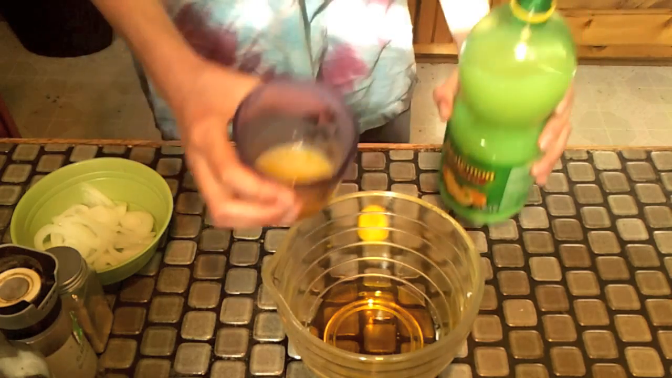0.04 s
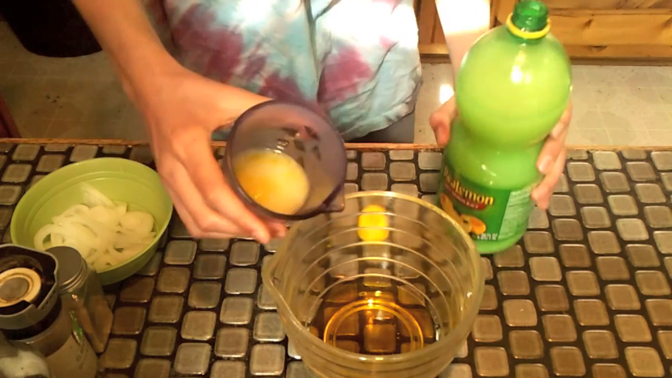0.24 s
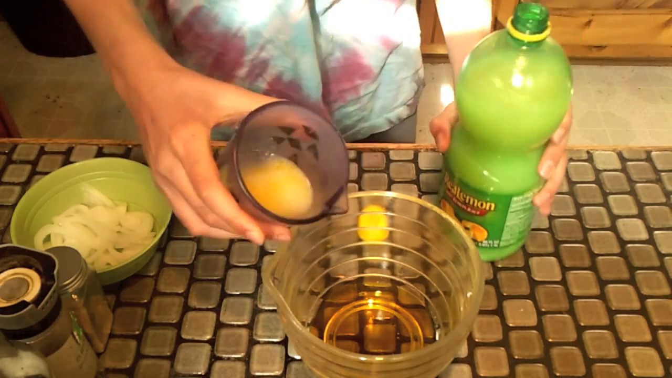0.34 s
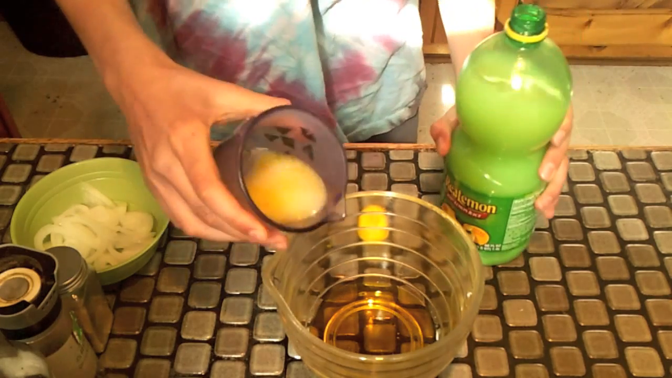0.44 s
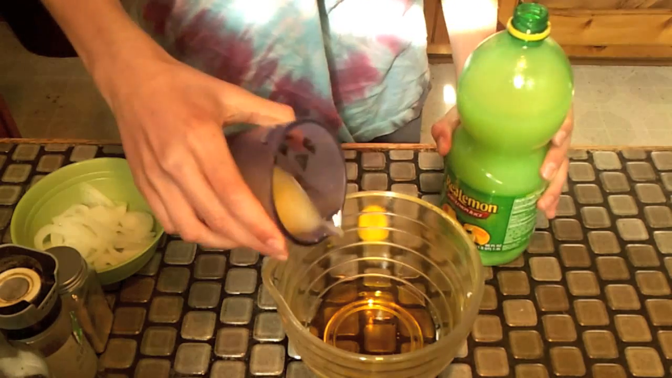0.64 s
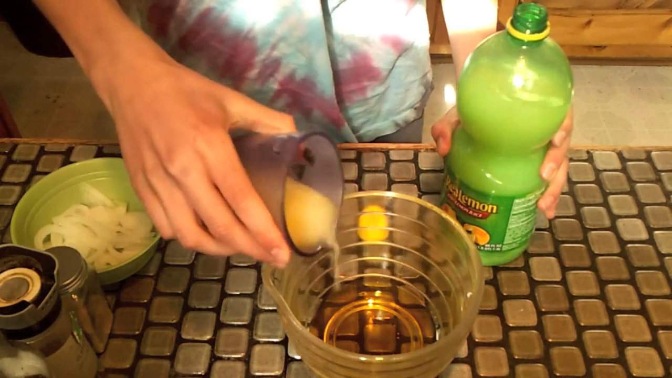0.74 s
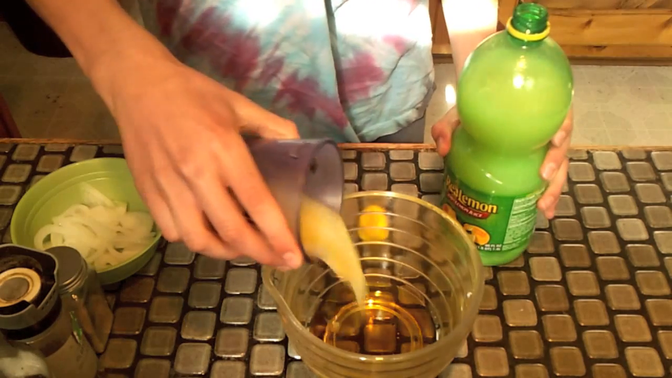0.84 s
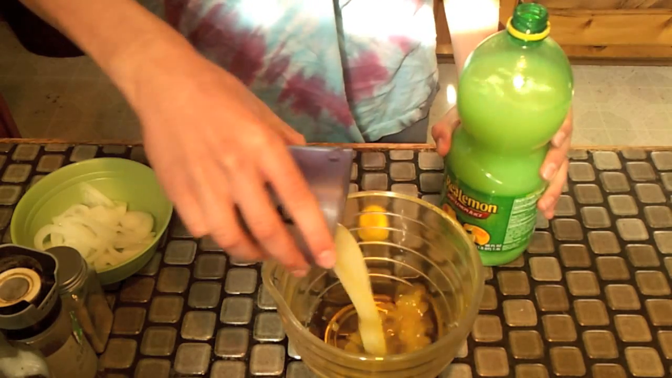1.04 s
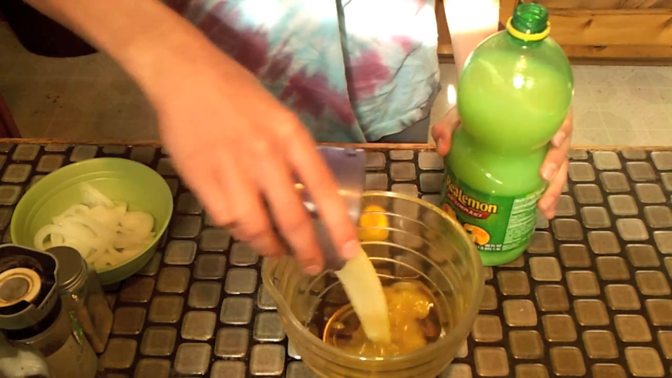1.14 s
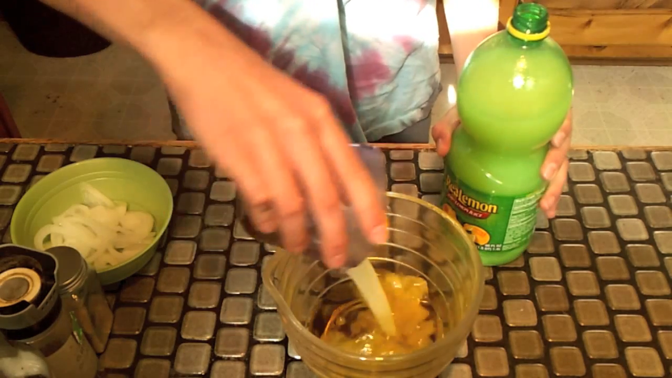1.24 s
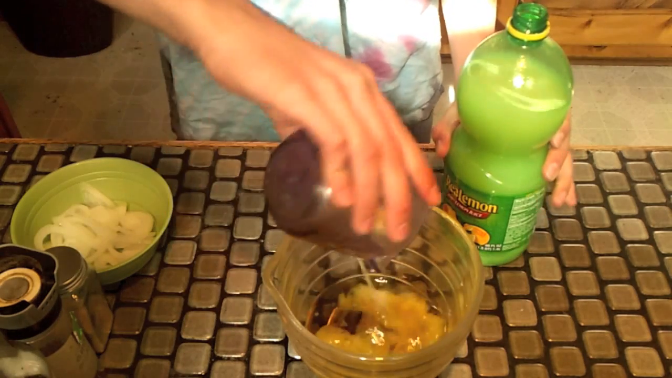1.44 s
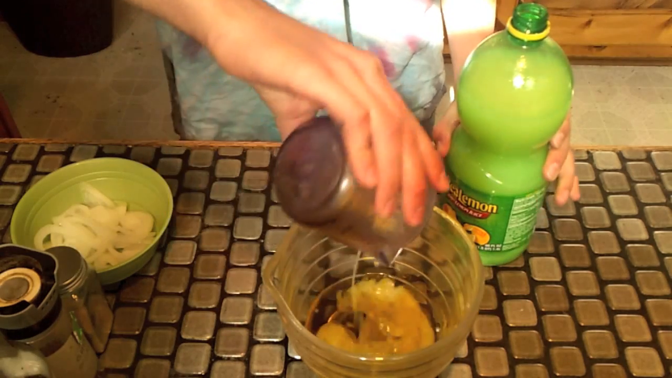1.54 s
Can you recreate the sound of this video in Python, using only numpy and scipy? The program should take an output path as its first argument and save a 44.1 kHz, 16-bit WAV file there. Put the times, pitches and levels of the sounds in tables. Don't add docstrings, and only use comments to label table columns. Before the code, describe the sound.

A plastic bottle thuds hard on a tiled counter, a glass bowl rings, then liquid drips and pops

```python
import sys
import numpy as np
from scipy import signal
from scipy.io import wavfile

SR = 44100
rng = np.random.default_rng(int(sys.argv[2]) if len(sys.argv) > 2 else 0)


def generate_wav(signal):
    frames = np.transpose(np.atleast_2d(signal))
    scaled = np.clip(frames, -1, 1) * 32767
    pcm = np.round(scaled).astype(np.int16)
    wavfile.write(sys.argv[1], SR, pcm)


def amplitude_ratio(level_db):
    exponent = np.asarray(level_db, float) / 20
    return 10 ** exponent


N = 70560
T = np.arange(N) / SR


def rms_one(x):
    return x / np.sqrt(np.mean(x ** 2) + 1e-20)


def at_hz(points, hz):
    table_hz, value = np.transpose(points)
    return np.interp(np.log(hz), np.log(table_hz), value)


def passband(x, low_hz, high_hz):
    edges_hz = [low_hz, min(high_hz, .45 * SR)]
    return signal.sosfilt(signal.butter(2, edges_hz, "band", fs=SR, output="sos"), x)


def ring(clicks, hz, t60_s):
    radius = amplitude_ratio(-60 / (t60_s * SR))
    angle = 2 * np.pi * hz / SR
    feedback = [1, -2 * radius * np.cos(angle), radius * radius]
    return signal.lfilter([0, np.sin(angle)], feedback, clicks + 1e-18)


def bands(spectrum, shape):
    edges_hz = 18 * 2 ** (np.arange(30) / 3)
    white = rng.standard_normal((2, N + 8192))
    out = 0
    for k, (low_hz, high_hz) in enumerate(zip(edges_hz, edges_hz[1:])):
        hz = np.sqrt(low_hz * high_hz)
        sos = signal.butter(2, [low_hz, high_hz], "band", fs=SR, output="sos")
        band = signal.sosfilt(sos, white[k % 2])[-N:]
        out = out + amplitude_ratio(at_hz(spectrum, hz)) / np.sqrt(300) * 12 * band * shape(hz)
    return out


# start_s [s], level_db [dB]
CONTACTS = [
    (0.2457, 0),
    (0.2466, -5),
    (0.2479, -4),
    (0.2508, -12),
]
BLOW_S = CONTACTS[0][0]
# pitch_hz [Hz], level_db [dB], t60_s [s]
BODY_LOW = [(151.5, -27, 0.4), (191, -13.5, 0.098), (232.6, -7, 0.21), (321, -14, 0.078),
            (404.7, -16.5, 0.11), (455, -21, 0.1), (590, -23, .1), (690.5, -13, .14), (779, -8.5, 0.026),
            (861, -15.5, 0.022), (1008, -13.5, 0.034), (1053, -19, 0.097), (1300, -51, 0.052)]
# pitch_hz [Hz], level_db [dB], t60_s [s]
BODY_HIGH = [(2660, -22, .03), (3560, -25, 0.017), (3497, -10.5, 0.034), (3620, -15.5, .02),
             (4480, -24.5, .04), (5750, -10, 0.013), (5900, -14.5, 0.026), (6286, -9, 0.022),
             (6944, -12, 0.018)]


def body():
    start_s, foot_db = np.transpose(CONTACTS)
    out = np.zeros(N)
    for hz, level_db, t60_s in BODY_LOW + BODY_HIGH:
        clicks = np.zeros(N)
        spread_db = 2.0 * rng.standard_normal(len(start_s))
        clicks[(start_s * SR).astype(int)] = amplitude_ratio(foot_db + level_db + spread_db)
        out += ring(clicks, hz, t60_s)
    return out


# pitch_hz [Hz], level_db [dB per Hz]
RATTLE = [(60, -16), (200, -15), (450, 1), (1000, -3), (2000, -19.5), (3500, -15.5), (6300, -33),
          (10000, -55)]
# pitch_hz [Hz], t60_s [s]
RATTLE_T60 = [(100, 0.58), (500, 0.37), (1400, 0.29), (4000, 0.26), (6000, 0.44), (11000, .12)]


def rattle():
    since_s = np.maximum(T - BLOW_S, 0)

    def shape(hz):
        decay = amplitude_ratio(-60 * since_s / at_hz(RATTLE_T60, hz))
        return decay * np.minimum(since_s * hz / 1.8, 1)

    rattle_db = -17.5
    return 8 * amplitude_ratio(rattle_db) * bands(RATTLE, shape)


def bottle():
    low_hz, high_hz = 115, 9500
    thud = passband(rattle() - body(), low_hz, high_hz)
    return passband(thud, low_hz, high_hz)


# start_s [s], level_db [dB], pitch_hz [Hz], t60_s [s]
CRACKS = [
    (0.2459, -14, 11000, .004),
    (0.246, -22, 14000, .003),
    (0.2479, -24, 10500, .004),
    (0.248, -30, 13500, .003),
]


def cracks():
    rise_s = 0.00019
    out = np.zeros(N)
    for start_s, level_db, hz, t60_s in CRACKS:
        since_s = np.maximum(T - start_s, 0)
        envelope = amplitude_ratio(level_db - 60 * since_s / t60_s) * np.minimum(since_s / rise_s, 1)
        out += envelope * np.sin(2 * np.pi * hz * since_s)
    return out


# pitch_hz [Hz], width_hz [Hz], level_db [dB], t60_s [s]
BUZZ = [(3360, 440, -38, 0.23), (6150, 580, -24, 0.26), (5610, 1800, -32.5, .2), (7470, 1100, -45, 0.13),
        (216, 47, -24, 0.44)]


def buzz():
    rise_s = 0.00265
    since_s = T - BLOW_S
    out = np.zeros(N)
    for hz, width_hz, level_db, t60_s in BUZZ:
        noise = rms_one(passband(rng.standard_normal(N), hz - width_hz / 2, hz + width_hz / 2))
        decay = amplitude_ratio(level_db - 60 * np.maximum(since_s, 0) / t60_s)
        out += decay * np.clip(since_s / rise_s, 0, 1) * noise
    return out


def rustle():
    level_db, low_hz, high_hz = -59, 1200, 5000
    rub = rms_one(passband(rng.standard_normal(N), low_hz, high_hz))
    return amplitude_ratio(level_db) * rub * (T < BLOW_S)


def settle():
    start_s, level_db, pitch_hz, t60_s, rise_s = 0.556, -33, 205, .16, .01
    since_s = np.maximum(T - start_s, 0)
    envelope = amplitude_ratio(level_db - 60 * since_s / t60_s) * np.minimum(since_s / rise_s, 1)
    return envelope * np.sin(2 * np.pi * pitch_hz * since_s)


# pitch_hz [Hz], level_db [dB], t60_s [s]
BOWL = [(824.3, -36, 1.45), (848, -28, .72), (2106, -32, .72), (2173, -34.5, .62), (3488, -26, .24),
        (3440, -30, .26), (6366, -29, .2), (9650, -41, .15), (8580, -43, .14)]


def bowl():
    delay_s, rise_s = .006, .025
    since_s = np.maximum(T - BLOW_S, 0)
    rung_s = np.maximum(since_s - delay_s, 0)
    swell = 1 - np.exp(-rung_s / rise_s)
    out = np.zeros(N)
    for hz, level_db, t60_s in BOWL:
        out += amplitude_ratio(level_db - 60 * since_s / t60_s) * swell * np.sin(2 * np.pi * hz * rung_s)
    return out


# delay_s [s], level_db [dB]
BOWL_ECHOES = [(.0012, -13), (.0022, -15), (.0038, -19), (.0058, -27), (.0135, -29), (.0162, -25)]


def bowl_echoes(x):
    response = np.zeros(SR // 20)
    response[0] = 1
    for k, (delay_s, level_db) in enumerate(BOWL_ECHOES):
        response[int(delay_s * SR)] = amplitude_ratio(level_db) * (-1) ** k
    return signal.fftconvolve(x, response)[:N]


# start_s [s], peak_db [dB], pitch_hz [Hz],
# ring_cycles [cycles], rise [pitch share]
DRIPS = [(0.1138, -33.5, 6000, 8.9, 0.036), (0.2234, -40, 6200, 50, 0.012), (0.3042, -19, 5600, 8.1, 0.028),
         (0.3046, -30.5, 8300, 5.7, 0), (0.573, -34, 5880, 18, 0.062), (1.02, -45, 1363, 30, 0.13),
         (1.0207, -42.5, 5000, 7.6, 0.055), (1.1458, -39, 3870, 17, 0.12), (1.155, -49, 2980, 13, .05),
         (1.1625, -37, 5900, 20, 0.023), (1.174, -34, 5200, 4.4, 0.011), (1.2077, -40, 5700, 13, 0.048),
         (1.219, -46.5, 2700, 19, 0.16), (1.2477, -31, 5900, 10.4, 0.017), (1.248, -41.5, 1660, 3.5, 0.073),
         (1.318, -34, 5900, 11, 0), (1.325, -26.5, 5820, 6, .05), (1.404, -40, 7900, 23, 0.083),
         (1.415, -37.5, 5160, 14, 0.034), (1.4537, -29, 6550, 19, -.05), (1.465, -35, 5300, 56, 0.16),
         (1.528, -33.5, 7000, 6.2, 0.011), (1.5509, -24, 4160, 6.9, 0.076),
         (1.1, -35, 5350, 11, 0.023), (1.559, -45, 4400, 30, .05), (2.2, -49, 2600, 3.5, 0),
                (1.0205, -53, 2800, 2.2, 0), (1.2475, -40, 4500, 2.5, 0), (0.67, -58, 8100, 5.5, -0.01),
                (1.539, -30.5, 7200, 7.3, -0.023), (1.552, -46, 1600, 8.6, -0.037),
                (1.564, -45, 1500, 7.6, 0.034), (1.565, -43, 4300, 2, 0), (1.5694, -32.5, 6250, 31, -.04),
                (1.577, -39, 5000, 13, .05)]


def drips():
    pops = []
    for start_s, peak_db, hz, cycles, rise in DRIPS:
        up_cycles, down_cycles = min(.3 * cycles, 3.0), .32 * cycles
        pops.append((start_s, peak_db, hz, up_cycles, down_cycles, rise / cycles))
    pops.append((1.0996, -10, 5450, 6.5, 2.7, 0))

    out = np.zeros(N + SR)
    t = np.arange(SR // 10) / SR
    for start_s, peak_db, hz, up, down, rise_per_cycle in pops:
        cycle = t * hz
        swell = np.sin(np.pi / 2 * cycle / up) ** 2
        fall = np.exp(-(np.abs(cycle - up) / down) ** 1.7)
        tone = np.sin(2 * np.pi * cycle * (1 + rise_per_cycle * cycle / 2))
        out[int(start_s * SR):][:len(t)] += amplitude_ratio(peak_db) * np.where(cycle < up, swell, fall) * tone
    return bowl_echoes(out)


def cavity():
    start_s, length_s, level_db = 1.103, .05, -46.5
    from_hz, to_hz = 5050, 5900
    progress = np.clip((T - start_s) / length_s, 0, 1)
    hz = from_hz + (to_hz - from_hz) * progress ** 2
    flutter = 1 + .7 * rms_one(passband(rng.standard_normal(N), 60, 600))
    envelope = amplitude_ratio(level_db - 6 * progress) * np.sqrt(np.sin(np.pi * progress) + 1e-12)
    return envelope * flutter * np.sin(2 * np.pi * np.cumsum(hz) / SR)


def fizz():
    from_s, fizz_per_s, fizz_db, fizz_hz = 1.0, 250, -62, 4500
    spray_s, spray_per_s, spray_db, spray_fade_s = 1.5505, 2000, 9, .035
    spray = (T > spray_s) * np.exp(-np.maximum(T - spray_s, 0) / spray_fade_s)
    size_db = 3.0 * np.minimum(rng.exponential(1, N), 2.5) + spray_db * spray
    sizes = amplitude_ratio(size_db) * rng.choice([-1, 1], N)
    chance = (fizz_per_s + spray_per_s * spray) / SR
    bursts = sizes * (rng.random(N) < chance) * (T > from_s)
    pitches_hz = fizz_hz * np.geomspace(.33, 1.5, num=16)
    dealt = rng.integers(0, 16, N)
    out = np.zeros(N)
    for k, hz in enumerate(pitches_hz):
        out += ring(bursts * (dealt == k), hz, 20.0 / hz)
    return amplitude_ratio(fizz_db) * out


def kitchen(x):
    room_db, t60_s, gap_s = -21, .22, .004
    t = np.arange(SR // 2) / SR
    tail = rng.standard_normal(len(t)) * amplitude_ratio(-60 * t / t60_s) * (t > gap_s)
    unit_tail = tail / np.sqrt(np.sum(tail ** 2))
    return amplitude_ratio(room_db) * signal.fftconvolve(x, unit_tail)[:N]


# pitch_hz [Hz], level_db [dB rms]
WHINE = [(5039.1, -82), (5879.8, -57), (5999.9, -78), (6119.7, -62), (6359.7, -71), (6600.7, -80)]


def whine():
    out = np.zeros(N)
    for hz, level_db in WHINE:
        out += np.sqrt(2) * amplitude_ratio(level_db) * np.sin(2 * np.pi * hz * T)
    flip_tone_hz, flip_rate_hz, flip_db = 7867.1, 29.97, -63.5
    flip = np.tanh(8 * np.sin(2 * np.pi * flip_rate_hz * T))
    return out + np.sqrt(2) * amplitude_ratio(flip_db) * np.sin(2 * np.pi * flip_tone_hz * T) * flip


# pitch_hz [Hz], level_db [dB per Hz]
FLOOR = [(25, 1), (80, -5.5), (200, -15), (500, -25), (1500, -36.5), (4000, -43), (6100, -34.5),
         (8000, -43.5)]


def background():
    floor_db, hiss_db = -42, -59.5
    rumble = amplitude_ratio(floor_db) * rms_one(bands(FLOOR, lambda hz: 1))
    hiss = amplitude_ratio(hiss_db) * rng.standard_normal(N)
    return rumble + hiss + whine()


def scene():
    blow = bottle() + cracks() + buzz() + settle() + bowl()
    wet = drips() + cavity() + fizz()
    return (blow + rustle() + wet + kitchen(wet) + background())[None]


def band_limit(x):
    return signal.sosfilt(signal.butter(12, 16360, fs=SR, output="sos"), x)


def record(dry):
    mix = np.clip(dry, -1.0, 1.0)
    return band_limit(mix)


dry = scene()
out = record(dry)
generate_wav(out)
```